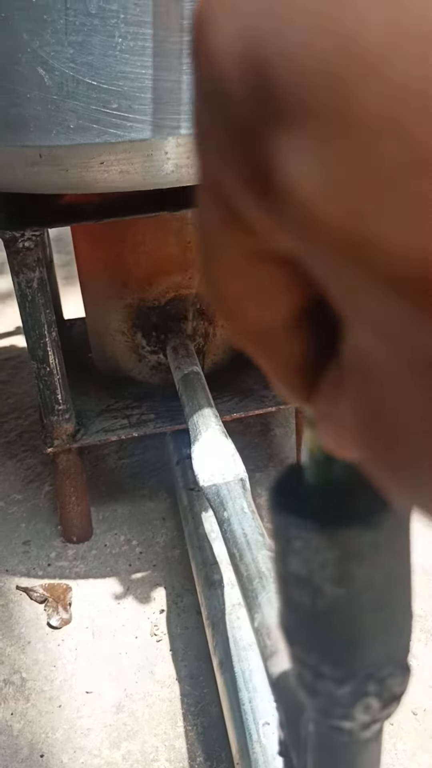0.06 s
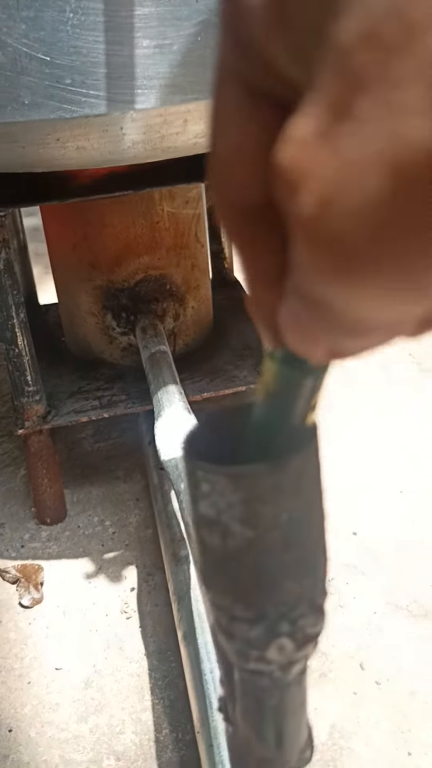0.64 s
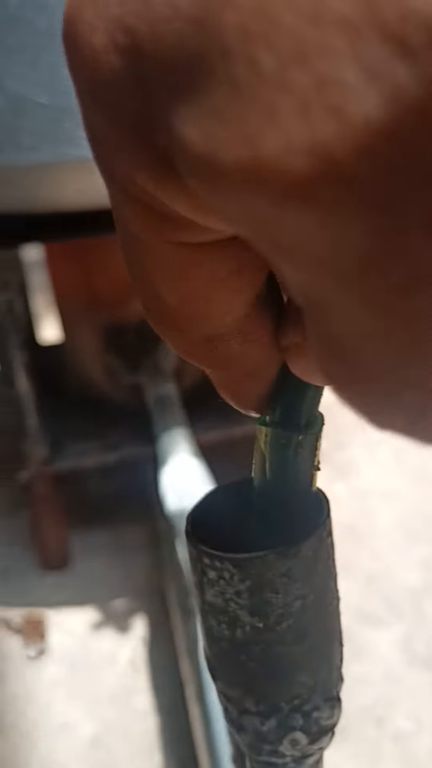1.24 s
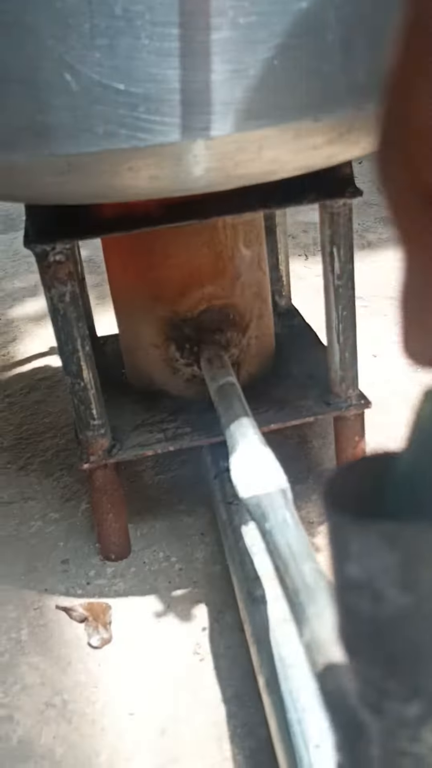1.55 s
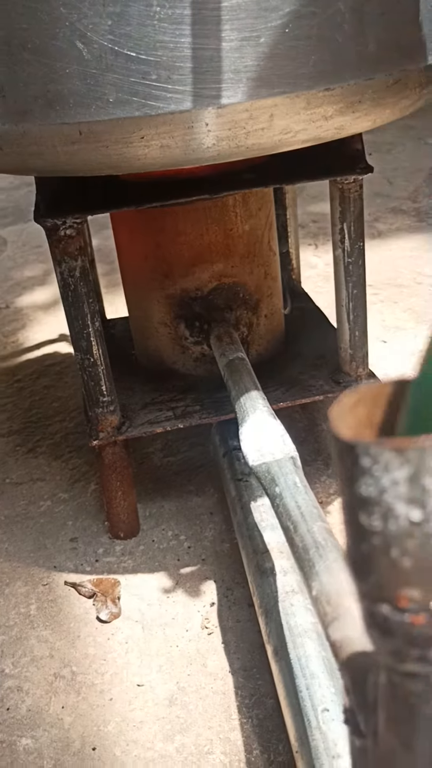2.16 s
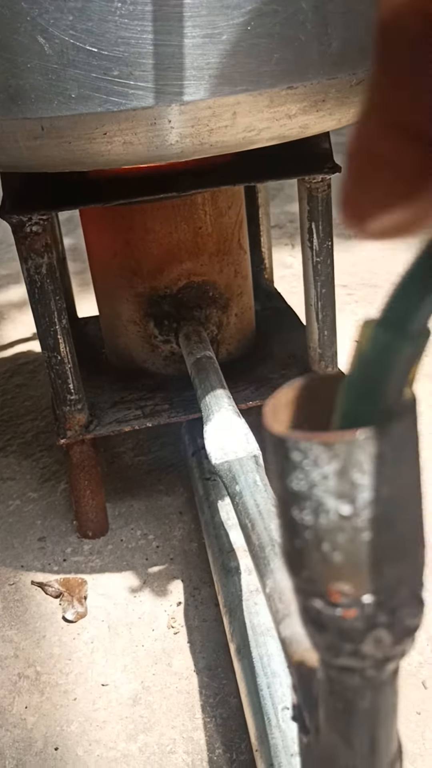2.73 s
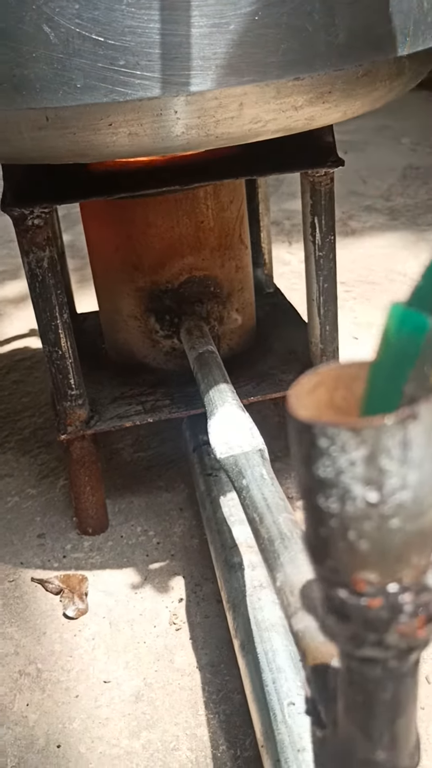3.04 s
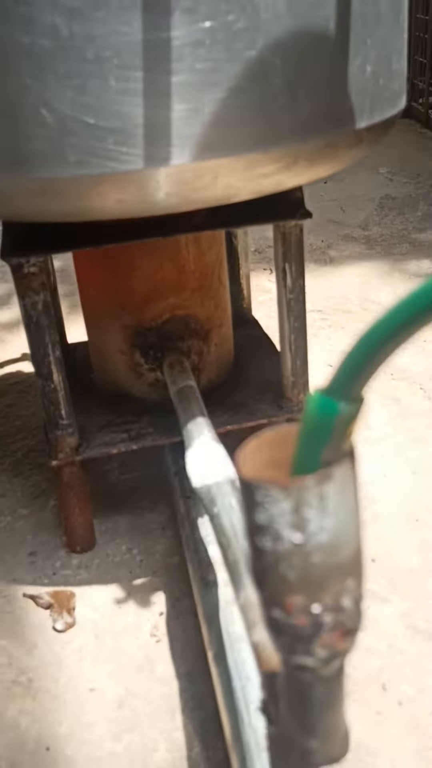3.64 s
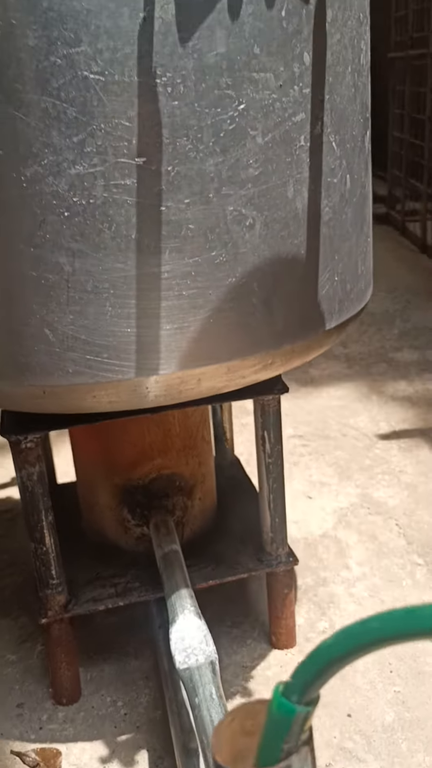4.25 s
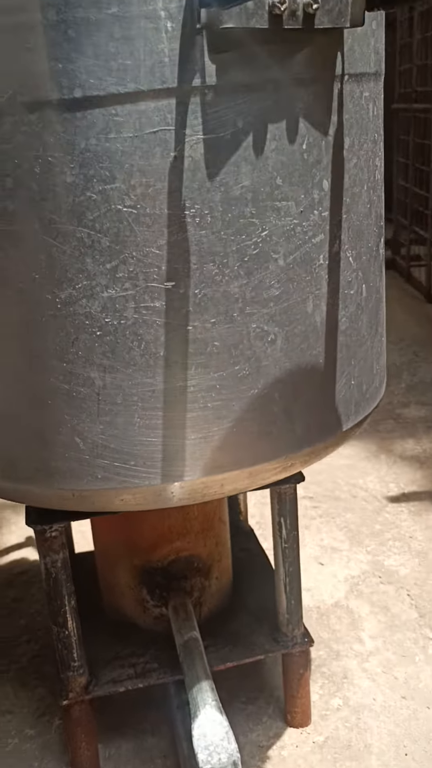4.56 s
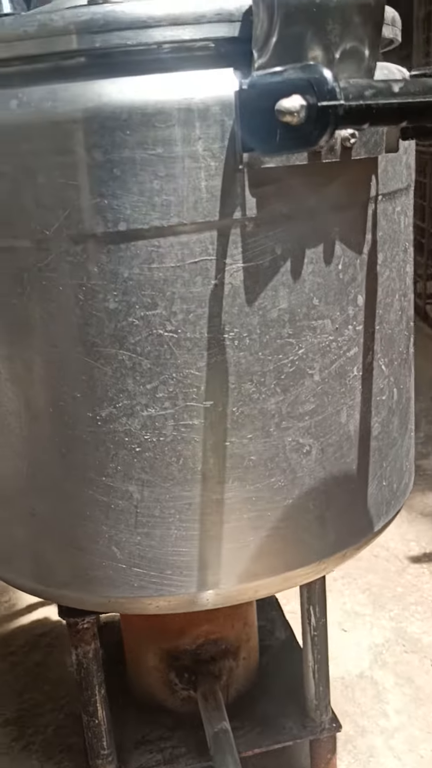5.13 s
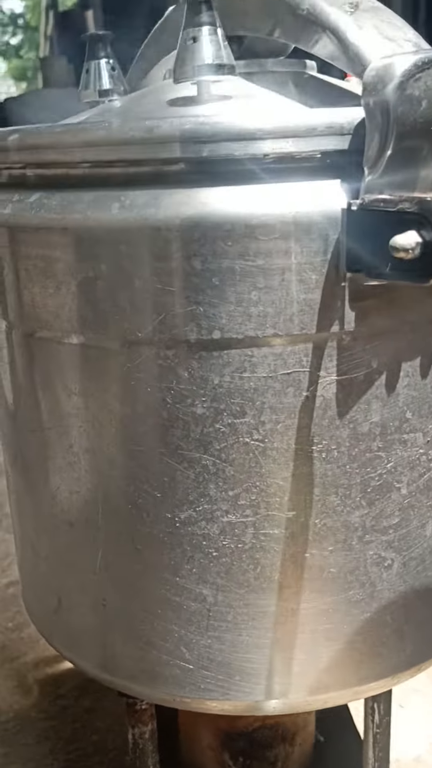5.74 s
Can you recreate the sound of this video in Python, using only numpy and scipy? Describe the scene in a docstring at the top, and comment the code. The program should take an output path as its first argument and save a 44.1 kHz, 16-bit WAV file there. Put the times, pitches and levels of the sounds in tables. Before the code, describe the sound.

Close, booming flame with a hollow howl, topped by the surging, sputtering hiss of an air jet spraying oil.

```python
"""A home-made waste oil burner fires a large metal pot outdoors, heard from close by.
Its swirling flame booms in the fire tube and howls out of the gap under the pot. Hot gas rushes
from the burner mouth, and an air jet hisses in surges as it tears blobs of oil into spray.
Near the end the microphone rises beside the pot, which softens the howl and changes the hiss's tone."""
import sys
import numpy as np
from scipy import signal
from scipy.fft import rfft, irfft
from scipy.io import wavfile
from scipy.ndimage import uniform_filter1d, map_coordinates

SR = 44100
rng = np.random.default_rng(int(sys.argv[2]) if len(sys.argv) > 2 else 0)


def wav_record(signal):
    """Record a signal, one row per channel, as 16-bit PCM in the file named by sys.argv[1]."""
    frames = np.transpose(np.atleast_2d(signal))
    bounded = np.clip(frames, -1, 1)
    # unit amplitude maps onto the largest positive 16-bit level
    quanta = np.round(bounded * 32767).astype(np.int16)
    wavfile.write(sys.argv[1], SR, quanta)


N = 264153
FREQS = np.maximum(np.fft.rfftfreq(N, 1 / SR), 1)
USUAL_FIRE_DB = -23


def from_db(db):
    """Turn decibels into a number to multiply by."""
    return 10 ** (np.asarray(db) / 20)


def unit_power(x):
    """Scale a signal so its average power is 1."""
    return x / np.sqrt(np.mean(x ** 2) + 1e-20)


def drift(rate_hz):
    """A random wobble of size about 1 that changes about rate_hz times a second."""
    return unit_power(irfft(rfft(rng.standard_normal(N)) / (1 + (FREQS / rate_hz) ** 2), N))


def steadied(x):
    """Even out the loudness over about a sixth of a second; faster flutter stays."""
    size = SR // 6
    return x / np.sqrt(uniform_filter1d(uniform_filter1d(x ** 2, size), size) + 1e-20)


def swell(start, length, attack_s, release_s):
    """Rise from 0 to 1, hold until the length is over, then fall back."""
    t = np.arange(N) / SR - start
    return np.clip(np.minimum(t / attack_s, 1 - (t - length) / release_s), 0, 1)


def colour(shape, rings):
    """How strong each frequency is: a broad shape that fades at both ends, plus ringing peaks."""
    shape_hz, shape_db = np.transpose(shape)
    broad = from_db(np.interp(np.log(FREQS), np.log(shape_hz), shape_db))
    ends = 1 / (1 + (shape_hz[0] / FREQS / 2) ** 2) / (1 + (FREQS / shape_hz[-1] / 2) ** 2)
    power = (broad * ends) ** 2
    for hz, width, db in rings:
        power += (from_db(db) / (1 + 2 * ((FREQS - hz) / width) ** 2)) ** 2
    return np.sqrt(power)


def turbulence(shape_low, shape_high, rings, height):
    """Swirling gas makes noise; its tone blends from the low to the high microphone position."""
    flow = rfft(rng.standard_normal(N))
    low = colour(shape_low, [(hz, width, db) for hz, width, db, _ in rings])
    high = colour(shape_high, [(hz, width, db) for hz, width, _, db in rings])
    return (1 - height) * unit_power(irfft(flow * low, N)) + height * unit_power(irfft(flow * high, N))


def flame(height, fire_db, flare_db, flutter_db=1.08, shade_db=-6.5):
    """Uneven burning shakes the fire tube and the gap under the pot; the pot partly blocks the howl."""
    # broad roar of the tube and of the gap: (frequency [Hz], relative level [dB])
    tube_roar = [(20, -62), (35, -36), (50, -34.5), (90, -19), (140, -15.5), (210, -16.5), (330, -15),
                 (490, -13.5), (620, -15.5), (900, -58)]
    gap_roar = [(380, -19.5), (500, -12.5), (620, -36), (740, -22), (830, -29), (960, -26.5), (1100, -34.5),
                (1500, -56)]
    # where they ring: (frequency [Hz], width [Hz], level facing burner [dB], level beside pot [dB])
    tube_rings = [(59.7, 12.6, -22.5, -24), (124, 16.5, -15.5, -13), (170.4, 20, -7, -8),
                  (240.6, 10.4, -3.5, -3.5), (263, 30, 1, -1.5), (299, 29, -4.5, -3),
                  (353, 10, -15.5, -9.5), (392, 15, -10, -23), (450, 20, -10, -20)]
    gap_rings = [(550, 34, -4.5, -1), (588.4, 15.8, 3.5, 1), (653.5, 26.7, 2.5, 1), (698, 18, -4, -5.5),
                 (753, 23.4, -12, -4), (815, 25, -22.5, -3.5), (863, 14, -31, -1.5),
                 (893, 17.6, -12, -14.5), (932, 22, -17, -12), (1003, 22, -23, -16), (1100, 38, -52, -15.5),
                 (1161, 8.9, -22.5, -22)]
    flutter = from_db(flutter_db * drift(rate_hz=30))
    boom = steadied(flutter * turbulence(tube_roar, tube_roar, tube_rings, height))
    howl = steadied(flutter * turbulence(gap_roar, gap_roar, gap_rings, height))
    howl_db = -21.5 + 0.63 * (fire_db - USUAL_FIRE_DB) + shade_db * height + flare_db
    return from_db(fire_db) * boom + from_db(howl_db) * howl


def gas_rush(height, fire_db, flare_db, flutter_db=1.08, shade_db=-2):
    """Hot gas in the burner mouth makes a soft, hollow rush that follows the fire's strength."""
    # tone of the rush from each position: (frequency [Hz], relative level [dB])
    facing_burner = [(700, -38), (1000, -11), (1200, -12.5), (1330, -4.5), (1430, -5), (1550, -0.5),
                     (1700, -6), (1950, -10.5), (2400, -15.5), (4000, -14)]
    beside_pot = [(700, -20), (1000, -10), (1200, -4.5), (1400, -1), (1600, -4), (1850, -8), (2050, -13),
                  (2600, -7), (4000, -28)]
    rush_db = -38 + 0.64 * (fire_db - USUAL_FIRE_DB) + shade_db * height + 0.3 * flare_db
    rush_db += flutter_db * drift(rate_hz=28)
    return from_db(rush_db) * turbulence(facing_burner, beside_pot, [], height)


def spray_level(steady_db=-28, waver_db=0.5):
    """The jet's level in dB: a gently wavering hiss plus one spurt for each blob of oil."""
    # blobs of oil hitting the air jet: (time [s], length [s], level [dB])
    spurts = [(0.039, 0.15, -18), (0.22, 0.09, -17), (0.352, 0.064, -21.5), (0.444, 0.063, -21),
              (0.552, 0.041, -23), (.72, 0.15, -28), (.945, 0.13, -17.5), (1.121, 0.065, -19),
              (1.244, .105, -19.5), (1.354, 0.15, -21.5), (1.595, 0.048, -20.5), (1.725, 0.061, -22.5),
              (1.81, .05, -26), (1.98, 0.17, -27), (2.149, 0.1, -19.5), (2.282, .1, -18.5),
              (2.42, 0.073, -26.5), (2.709, 0.1, -21.8), (2.804, 0.11, -19), (2.912, 0.11, -24.5),
              (3.047, .05, -23), (3.166, 0.093, -19), (3.274, 0.08, -17.5), (3.548, 0.082, -18),
              (3.648, 0.062, -18), (3.765, 0.055, -24), (3.9, .11, -18.2), (4.03, 0.15, -27.5),
              (4.24, 0.11, -17.5), (4.384, 0.084, -17), (4.49, 0.081, -18), (4.605, 0.071, -16.5),
              (4.732, 0.078, -17), (4.834, 0.074, -19), (4.945, 0.039, -21.5), (5.039, 0.075, -21.5),
              (5.149, 0.066, -19), (5.282, 0.11, -15.5), (5.431, 0.074, -18), (5.552, 0.12, -19),
              (5.738, .072, -21.5), (5.861, 0.064, -19.5), (5.95, .05, -22)]
    power = from_db(steady_db + waver_db * drift(rate_hz=10)) ** 2
    for start, length, db in spurts:
        power += (from_db(db) * swell(start, length, attack_s=0.039, release_s=0.064)) ** 2
    return 10 * np.log10(power)


def air_jet(height, sputter_db=0.23, spray_db=0.14, patchy_db=0.82):
    """The jet's hiss swells and sputters as it breaks blobs of oil into spray."""
    # tone of the hiss from each position: (frequency [Hz], relative level [dB])
    facing_burner = [(1200, -25), (2400, -24), (3400, -14.5), (4400, -10.5), (5500, -8.5), (6400, -5.5),
                     (7700, -6), (8600, -6.5), (9700, -13.5), (10800, -10), (11500, -5), (12200, -5.5),
                     (13200, 1), (15200, -8.5)]
    beside_pot = [(1200, -37), (2080, -20), (2750, -14.5), (3300, -12.5), (4100, -9), (5300, -6),
                  (6500, -1), (7200, 2), (8150, 0.5), (9700, -8.5), (10900, -10), (12400, -5.5), (13400, 5),
                  (15300, -2)]
    # nozzle pipe ringing: (frequency [Hz], width [Hz], level facing burner [dB], level beside pot [dB])
    nozzle_rings = [(4860, 440, -6.5, -18), (7020, 240, -1.5, -10)]
    # how much each band of the hiss swells: (frequency [Hz], rise [dB per dB of surge])
    surge_bands = [(2000, 1.61), (3000, 0.73), (4500, 0.8), (8000, 0.98), (13000, 1.15)]
    jet_db = spray_level()
    usual_db = np.mean(jet_db)
    hiss = turbulence(facing_burner, beside_pot, nozzle_rings, height)
    spectrum = rfft(nearby_echoes(hiss, height))
    sputter = unit_power(from_db(sputter_db * drift(rate_hz=90) + spray_db * drift(rate_hz=450)))
    centres_hz, depths = np.transpose(surge_bands)
    surging = np.zeros(N)
    for depth, share in zip(depths, np.eye(len(depths))):
        band = irfft(spectrum * np.interp(FREQS, centres_hz, share), N)   # overlaps its neighbours
        surging += band * from_db(depth * (jet_db - usual_db) + patchy_db * drift(rate_hz=16))
    return from_db(usual_db) * sputter * surging


def nearby_echoes(x, height, echo_db=-13, sway_s=0.00005):
    """Ground, stand and pot send back short echoes that shift as the hand-held microphone moves."""
    # (delay [s], change at full height [s])
    echoes = [(0.0013, -0.011), (0.0031, 0.0022), (0.0074, 0.0008), (0.0118, 0.004)]
    mixed = x.copy()
    for delay_s, change_s in echoes:
        lag = (delay_s + change_s * height + sway_s * drift(rate_hz=1)) * SR
        mixed += from_db(echo_db) * map_coordinates(x, [np.arange(N) - lag], order=3, mode="mirror")
    return unit_power(mixed)


def pot_wall(x, height, echo_db=-8, delay_s=0.00022):
    """Close to the pot, its wall adds a quick, dull echo that hollows the sound near 2 kHz."""
    dulled = uniform_filter1d(x, size=3)
    echo = map_coordinates(dulled, [np.arange(N) - delay_s * SR], order=1)
    closeness = np.exp((height - 1) / 0.14)
    return x + from_db(echo_db) * closeness * echo


def scene():
    """Flame, gas and jet sound together, the same in both channels."""
    # microphone path: (time [s], height [0 = facing burner, 1 = beside pot])
    microphone_path = [(0, 0.051), (4.28, .05), (4.48, 0.68), (5.05, .62), (5.4, 0.844), (5.75, 0.94),
                       (5.99, .88)]
    # strength of the fire, as the boom of its tube: (time [s], level [dB])
    fire_strength = [(0, -20.5), (.6, -23), (1.1, -22.5), (1.75, -26), (2.3, -19.5), (3.2, -21.5),
                     (3.48, -23.5), (3.98, -21.5), (4.55, -25.5), (5.99, -24)]
    # the flame flares and the gap howls louder: (time [s], length [s], rise [dB])
    flares = [(.433, 0.027, 4.5), (.952, 0.084, 6), (1.838, 0.06, 3.5), (2.64, 0.029, 3),
              (2.862, 0.039, 6.5), (3.869, 0.047, 4.5), (4.05, 0.031, 5), (4.183, .11, 3)]
    t = np.arange(N) / SR
    height = np.interp(t, *np.transpose(microphone_path))
    fire_db = np.interp(t, *np.transpose(fire_strength))
    flare_db = sum(db * swell(start, length, attack_s=0.0089, release_s=0.021)
                   for start, length, db in flares)
    roar = flame(height, fire_db, flare_db)
    rush_and_hiss = gas_rush(height, fire_db, flare_db) + air_jet(height)
    burner = roar + pot_wall(rush_and_hiss, height)
    return np.stack([burner, burner])


def record(dry, low_cut_hz=42, high_cut_hz=15580):
    """The microphone loses the deepest rumble, and the highest hiss is cut off sharply."""
    low_cut = signal.butter(3, low_cut_hz, "high", fs=SR, output="sos")
    high_cut = signal.ellip(12, 0.1, 90, high_cut_hz, fs=SR, output="sos")
    return signal.sosfilt(high_cut, signal.sosfilt(low_cut, dry))


dry = scene()
out = record(dry)
wav_record(out)
```